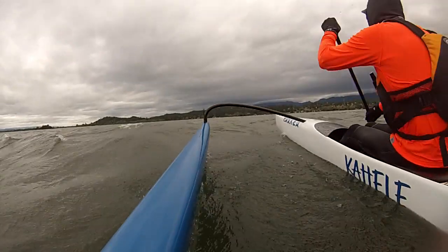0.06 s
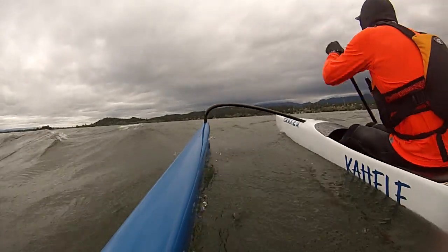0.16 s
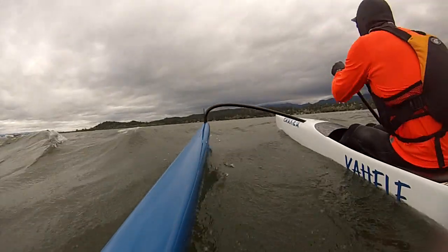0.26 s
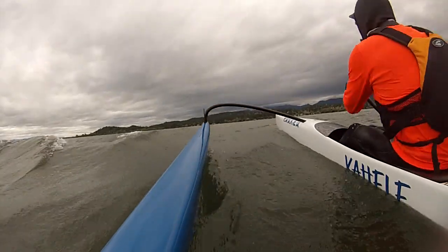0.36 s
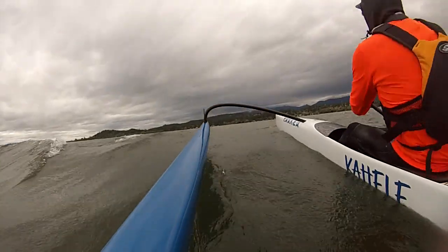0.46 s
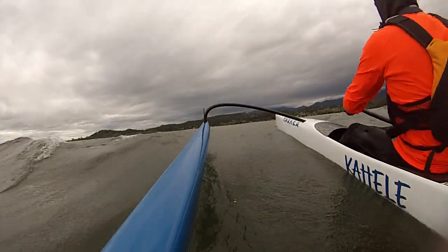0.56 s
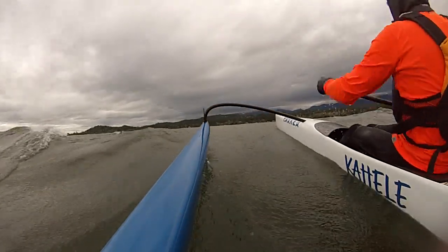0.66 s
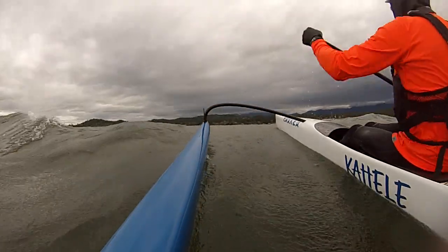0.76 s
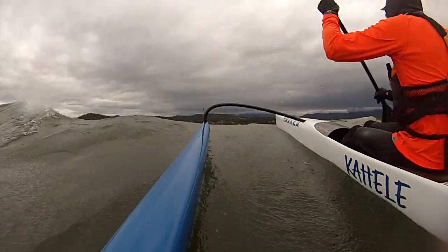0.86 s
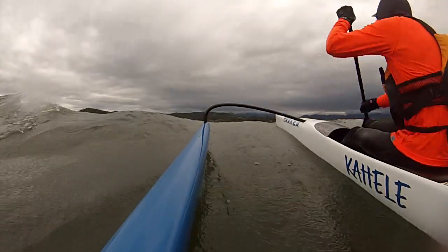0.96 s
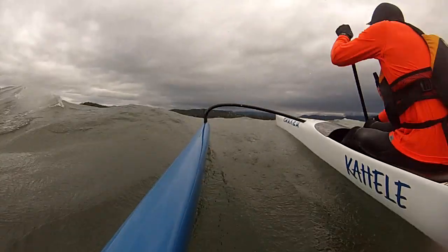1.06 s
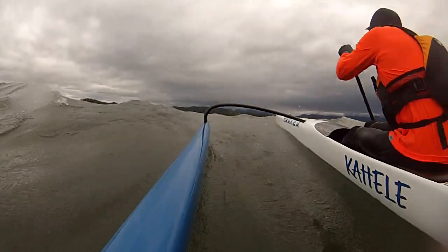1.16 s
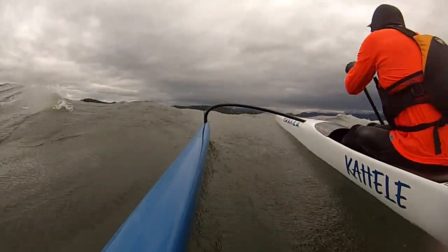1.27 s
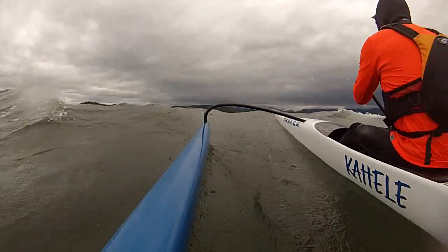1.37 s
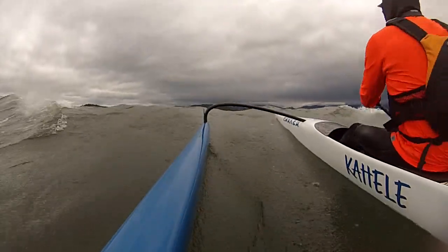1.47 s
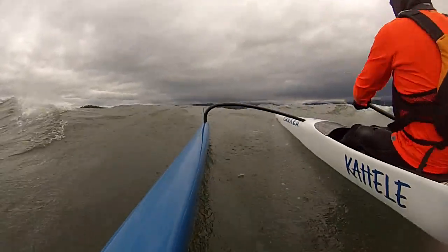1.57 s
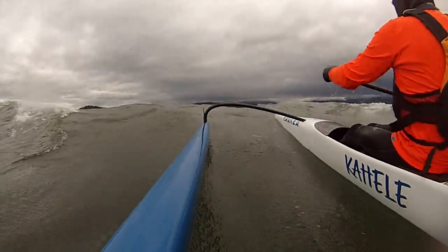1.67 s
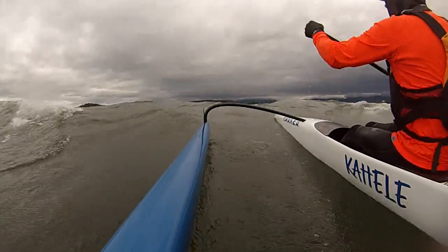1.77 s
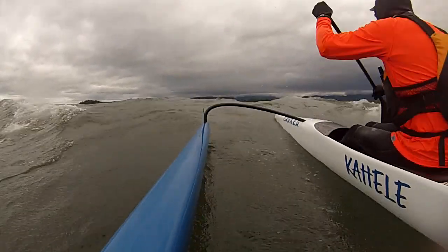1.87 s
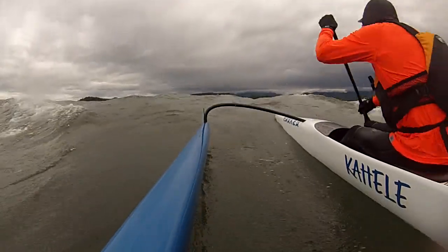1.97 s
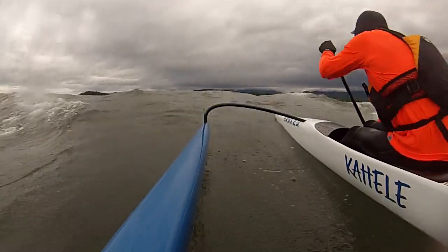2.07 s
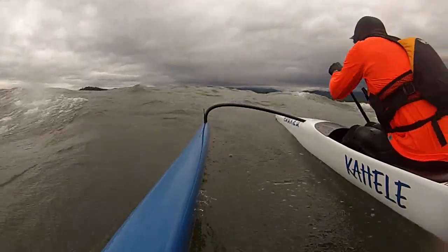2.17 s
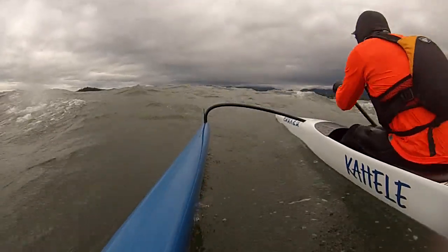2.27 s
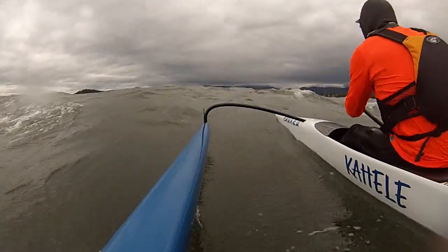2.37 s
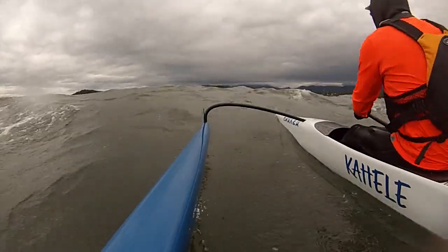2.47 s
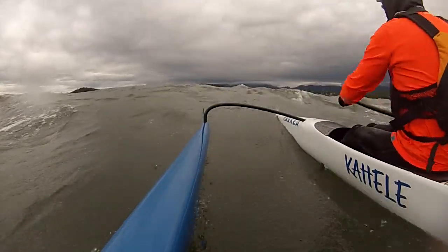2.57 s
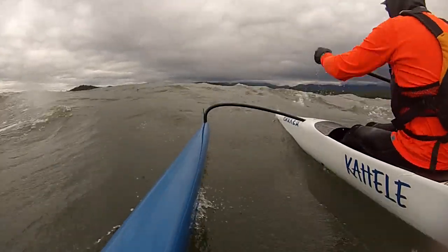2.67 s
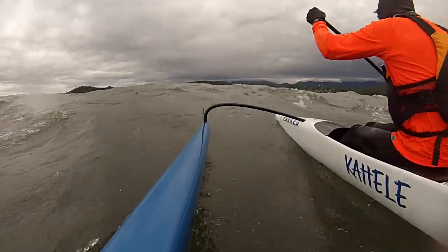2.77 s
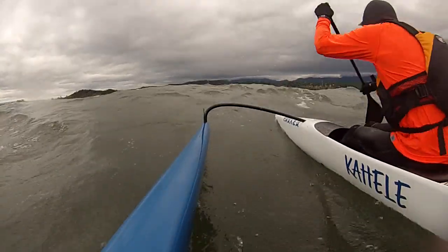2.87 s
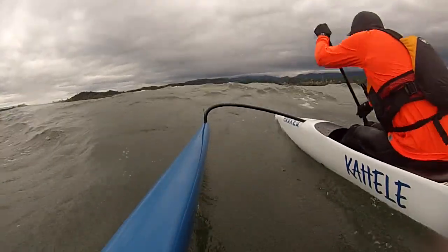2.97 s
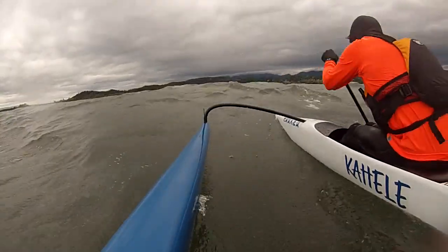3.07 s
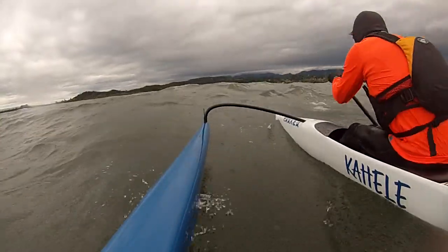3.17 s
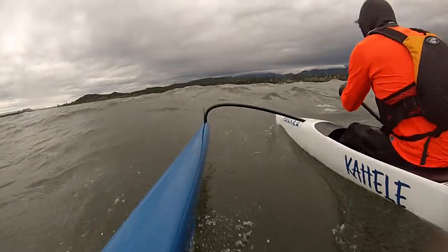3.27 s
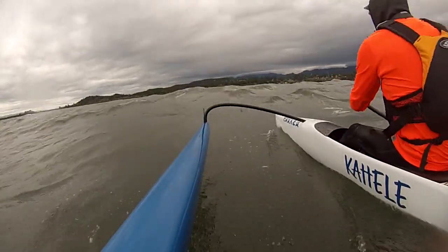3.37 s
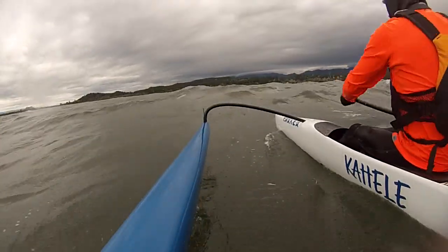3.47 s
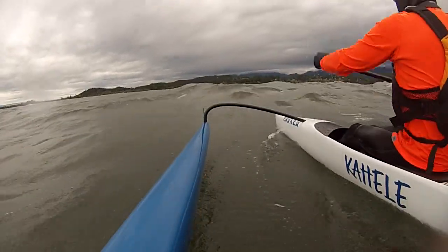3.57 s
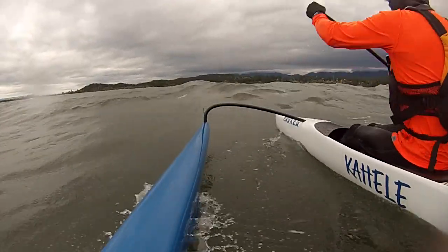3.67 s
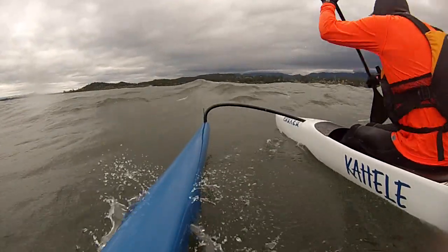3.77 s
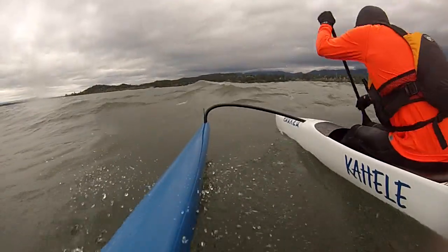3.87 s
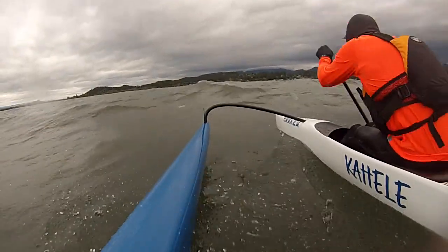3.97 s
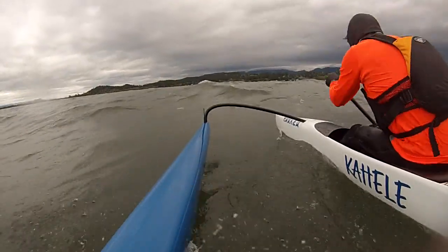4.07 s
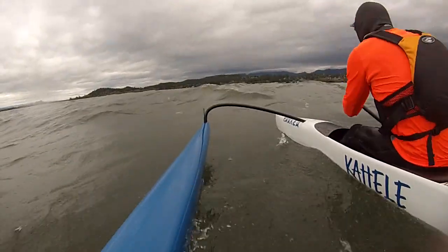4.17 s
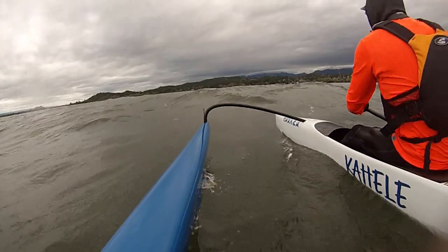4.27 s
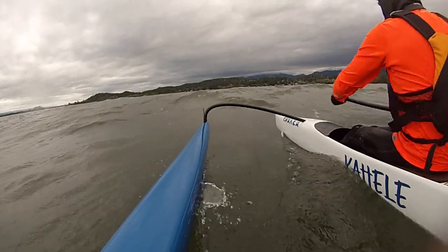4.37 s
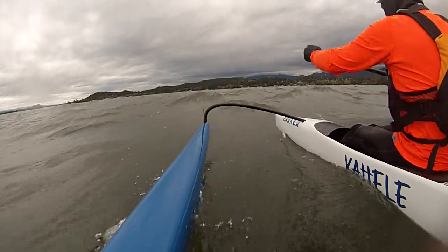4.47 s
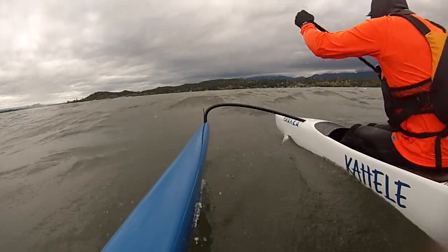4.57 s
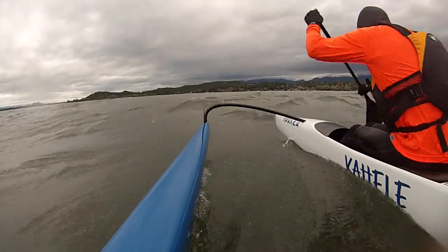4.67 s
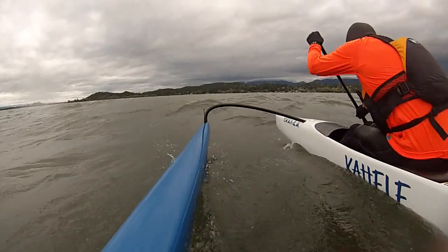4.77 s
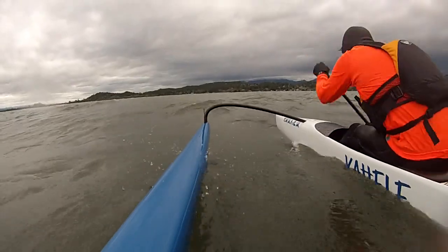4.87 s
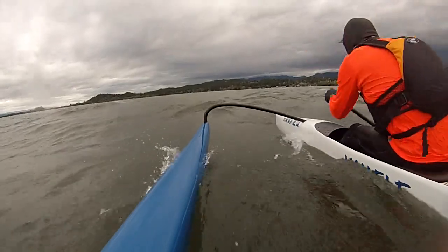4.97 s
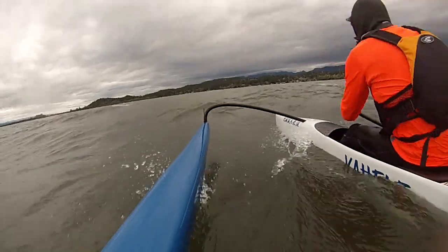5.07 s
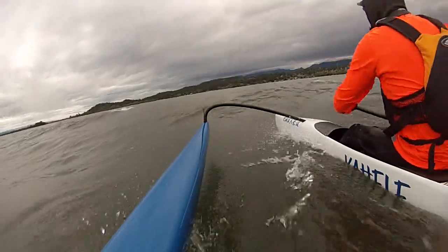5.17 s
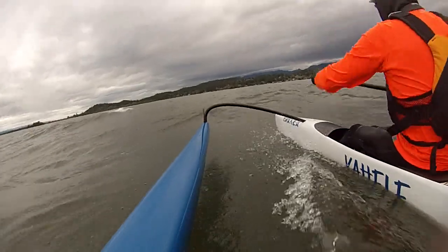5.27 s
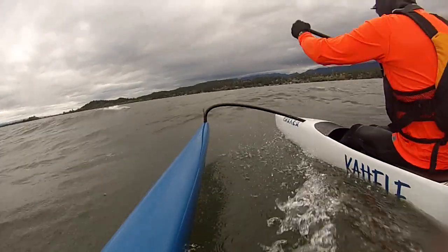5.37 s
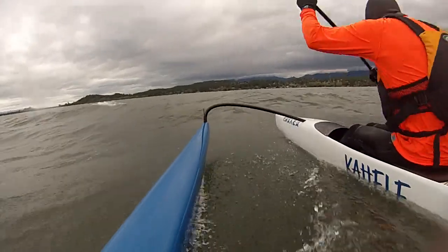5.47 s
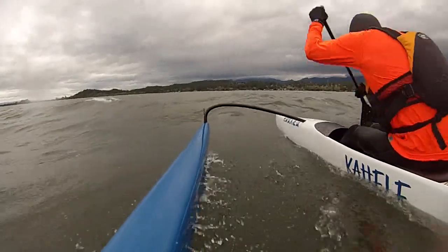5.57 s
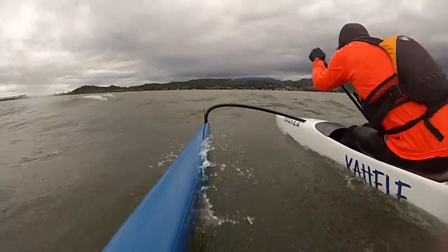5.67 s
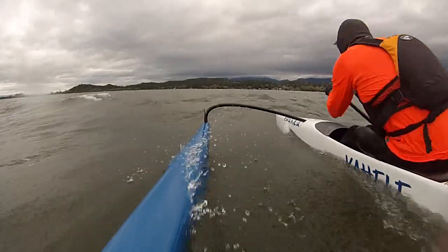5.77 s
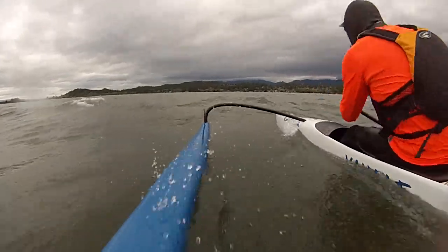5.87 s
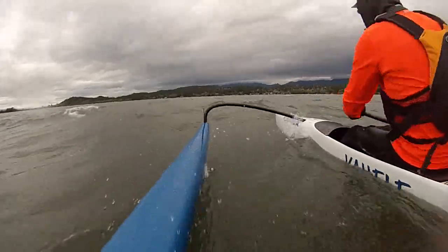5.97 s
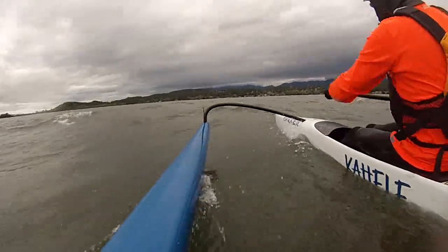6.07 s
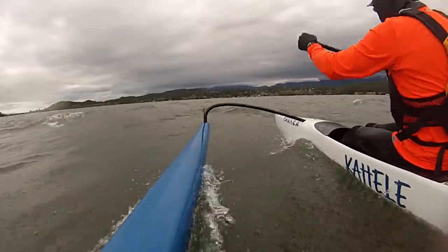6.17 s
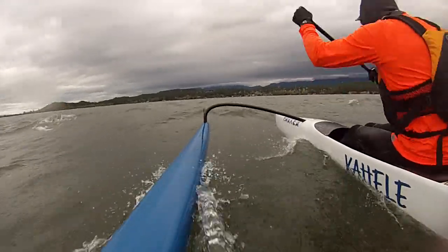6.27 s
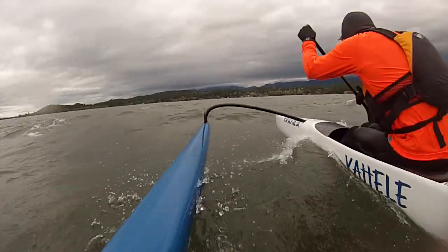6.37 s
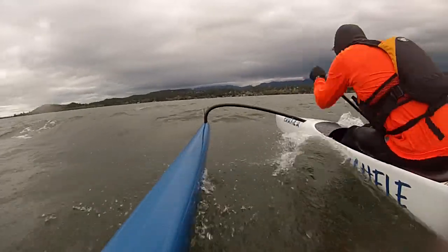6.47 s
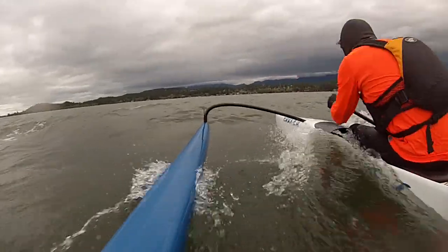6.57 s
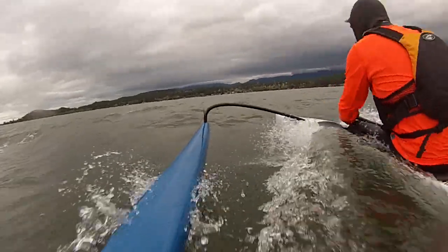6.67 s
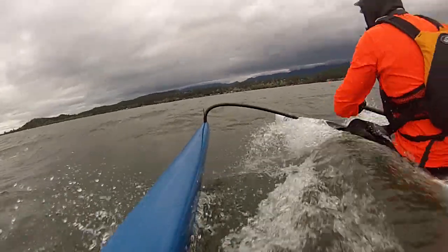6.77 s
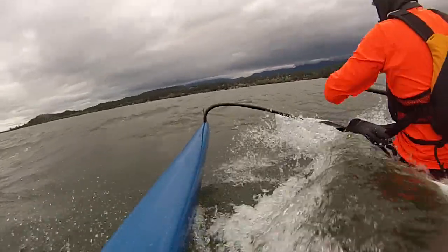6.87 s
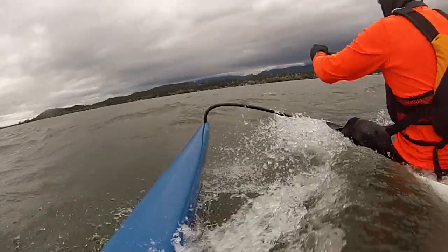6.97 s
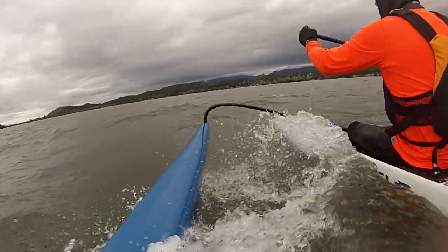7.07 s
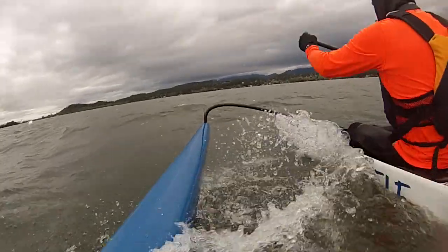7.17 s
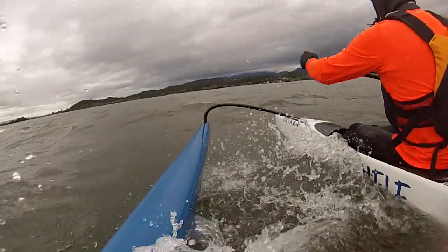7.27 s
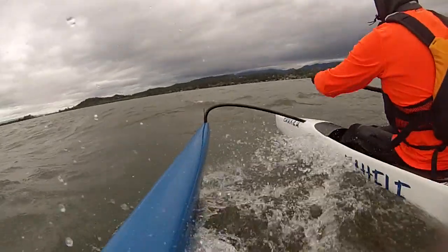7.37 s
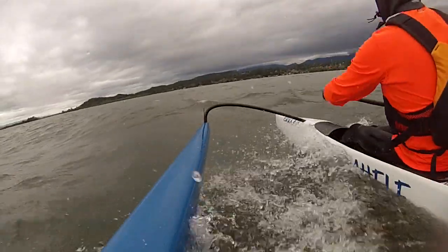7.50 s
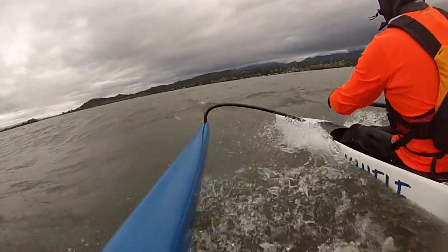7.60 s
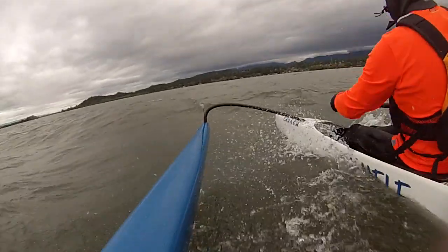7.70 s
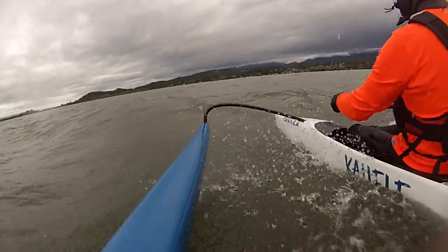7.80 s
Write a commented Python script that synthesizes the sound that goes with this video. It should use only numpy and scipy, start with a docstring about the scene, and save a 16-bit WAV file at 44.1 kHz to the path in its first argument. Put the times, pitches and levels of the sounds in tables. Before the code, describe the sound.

Muffled water washes and slaps against an outrigger canoe in choppy waves, with hollow thumps, bubbly plips and low wind rumble.

```python
"""Outrigger canoe surfing wind chop

Heard from a microphone sealed in a case on the float, so water arrives mostly through the shell:
wash, slaps and drops all ring the same hull and case resonances, and trapped bubbles plip.
Underneath, the mount sways, wind rumbles and the float drums and thumps on the waves.
Spray ticks on the case, and only a faint hiss of it gets through."""
import sys
import numpy as np
from scipy import signal
from scipy.io import wavfile

SR = 44100
rng = np.random.default_rng(int(sys.argv[2]) if len(sys.argv) > 2 else 0)


def wav_record(signal):
    """Record a signal, one row per channel, as 16-bit PCM in the file named by sys.argv[1]."""
    frames = np.transpose(np.atleast_2d(signal))
    bounded = np.clip(frames, -1, 1)
    # unit amplitude maps onto the largest positive 16-bit level
    quanta = np.round(bounded * 32767).astype(np.int16)
    wavfile.write(sys.argv[1], SR, quanta)


N = 345744


def amp(db):
    """dB to gain."""
    return 10 ** (np.asarray(db) / 20)


def rms_one(x):
    """Scale to rms 1."""
    return x / np.sqrt(np.mean(x ** 2) + 1e-20)


def curves(rows):
    """Automation lanes from a table of breakpoints, one value a sample."""
    times, *columns = np.transpose(rows)
    return [np.interp(np.arange(N) / SR, times, column) for column in columns]


def drift(rate):
    """Slow random modulation of rms 1; a higher rate moves faster."""
    step, settle = 40, 2000
    pole = np.exp(-2 * np.pi * rate * step / SR)
    noise = rng.standard_normal(N // step + settle + 2)
    slow = signal.lfilter([1], [1, -2 * pole, pole * pole], noise)[settle:]
    return np.interp(np.arange(N) / step, np.arange(len(slow)), rms_one(slow))


def bandpass(low_hz, high_hz, order=2):
    """A gentle band-pass filter."""
    return signal.butter(order, [low_hz, high_hz], "band", fs=SR, output="sos")


def band_noise(low_hz, high_hz, order=2):
    """Band-passed noise of rms 1."""
    return rms_one(signal.sosfilt(bandpass(low_hz, high_hz, order), rng.standard_normal(N)))


def peaks_and_dips(table):
    """A parametric EQ, one bell a row."""
    sections = []
    for hz, width_hz, db in table:
        w, gain = 2 * np.pi * hz / SR, amp(db / 2)
        damp = np.sin(w) * width_hz / hz / 2
        zeros = [1 + damp * gain, -2 * np.cos(w), 1 - damp * gain]
        poles = [1 + damp / gain, -2 * np.cos(w), 1 - damp / gain]
        sections.append(np.array(zeros + poles) / poles[0])
    return np.array(sections)


def swell(t, attack_s, decay_s):
    """A soft attack on a tail that falls 60 dB in decay_s."""
    return (1 - np.exp(-t / attack_s)) * amp(-60 * t / decay_s)


def span(start_s, samples):
    """An event's slice of the timeline and its own clock in seconds."""
    start = round(start_s * SR)
    end = min(N, start + samples)
    return slice(start, end), np.arange(end - start) / SR


def wavering(hz, spread, rate):
    """A tone of rms 1 whose pitch wanders."""
    pitch_hz = hz * (1 + spread * drift(rate))
    return np.sqrt(2) * np.sin(2 * np.pi * np.cumsum(pitch_hz) / SR)


def add_plop(out, start_s, db, hz, decay_s, length_s, scatter, count):
    """Mix in a quick run of bubbles near one pitch: dying sines that bend up, each softer than the last."""
    where, t = span(start_s, round(length_s * SR))
    for k, (detune, wait) in enumerate(rng.random((count, 2))):
        age = np.maximum(t - k * wait * .12 * decay_s, 0)
        envelope = amp(db - 4.5 * k) * swell(age, .00049, decay_s)
        pitch_hz = hz * (1 + scatter * (2 * detune - 1) * min(k, 1))
        out[where] += envelope * np.sin(2 * np.pi * pitch_hz * (age + .56 * age * age))


# Level ride of the swaying mount: (time [s], level [dB])
SWAY = [(0.0, -35), (0.13, -27.5), (0.48, -40.5), (1.44, -46.5), (1.53, -38), (1.94, -42), (2.12, -30.5),
        (2.36, -39.5), (3.75, -44), (3.8, -47), (4.34, -30.5), (4.65, -46), (4.78, -34.5), (5.46, -43.5),
        (6.2, -36), (6.24, -25), (6.4, -28), (6.46, -46), (6.62, -20), (6.79, -31), (7.64, -25.5),
        (7.84, -34)]


def sway_and_rumble():
    """The mount sways on one sub-bass note; wind rumble follows part of its swing."""
    (sway_db,) = curves(SWAY)
    sway = amp(sway_db + 1.65 * drift(5.2)) * wavering(hz=39, spread=.027, rate=8.6)
    rumble_db = -45 + .63 * (sway_db - sway_db.mean())
    return sway + amp(rumble_db) * band_noise(14, 40)


# Sheets of spray flung over the case: (time [s], body level [dB], top against body [dB])
SPRAY_SHEETS = [(2.5294, -57, -12), (2.9607, -51, -20), (3.1164, -56, -9), (3.3677, -52, -15),
                (3.4181, -52, -12), (3.6706, -40, -13), (4.1739, -46, -15), (4.2634, -64, -5),
                (5.4094, -57, -10), (5.529, -42, -21), (5.9394, -54, -15), (6.3086, -54, -22),
                (6.9486, -40.5, -18), (6.9794, -33, -19), (7.0873, -47, -21), (7.2424, -50, -16),
                (7.447, -38, -25)]


def sheet_envelopes():
    """Each sheet of spray flares up and dies fast; rows: body, top."""
    envelopes = np.zeros((2, N))
    for start_s, db, top_db in SPRAY_SHEETS:
        where, t = span(start_s, SR // 3)
        envelopes[:, where] += amp([[db], [db + top_db]]) * swell(t, attack_s=.0081, decay_s=.07)
    return envelopes


# Bed of airborne spray: (time [s], level [dB])
SPRAY_BED = [(0.0, -66), (1.09, -69.5), (2.68, -64), (2.82, -66.5), (3.38, -65), (3.62, -58.5), (3.95, -65),
             (4.11, -60), (4.3, -60.5), (4.72, -62), (5.17, -60.5), (5.43, -56), (5.79, -57), (6.07, -54),
             (6.6, -57), (7.12, -44.5), (7.44, -48), (7.84, -50)]
# Colour of the air path through the case: (centre [Hz], width [Hz], gain [dB])
CASE_EQ = [(2970, 3800, -0.5), (4410, 1220, -9.5), (5100, 170, 2.5), (5840, 270, -8.5), (6820, 720, 2),
           (7500, 320, 1), (9400, 550, 0), (11700, 310, -0.5), (14000, 4000, -7)]


def spray(drops, splash):
    """Smooth hiss with a few droplets in it leaks through the case; breaking water brightens it."""
    (bed_db,), (sheet_body, sheet_top) = curves(SPRAY_BED), sheet_envelopes()
    body = amp(bed_db) + splash + sheet_body
    top = amp(bed_db - 20) + .15 * splash + sheet_top
    out = 0
    for low_hz, high_hz, envelope in [(2510, 4870, body), (6770, 10800, top)]:
        hiss = band_noise(low_hz, high_hz)
        droplets = rms_one(signal.sosfilt(bandpass(low_hz, high_hz), drops))
        flutter = amp(1.45 * drift(26))
        out = out + envelope * flutter * (hiss + amp(-6.5) * droplets)
    return signal.sosfilt(peaks_and_dips(CASE_EQ), out)


def stray_drops(count=50):
    """Random cues for small drops: they ride the spray bed, and the higher ones are softer."""
    when, height, softness = rng.random((count, 3)).T
    times, octaves = when * N / SR, 2 * height
    bed_db = np.interp(times, *np.transpose(SPRAY_BED))
    levels_db = bed_db + 1 - 5 * octaves - 8 * softness
    return list(zip(times, levels_db, 3000 * 2 ** octaves))


# The loudest spray drops on the case: (time [s], relative level [dB], pitch [Hz])
SPATTER = [(2.371, -56, 6160), (2.375, -50, 3060), (2.518, -58, 9090), (2.726, -52, 3190),
           (3.117, -59, 8910), (3.368, -56, 7580), (3.42, -57, 9130), (3.672, -46, 5200),
           (3.682, -44, 6800), (4.15, -54, 4180), (4.264, -49, 9090), (4.538, -51, 6890),
           (4.721, -55, 3830), (4.976, -54, 5500), (5.549, -50, 5250), (6.227, -52, 4900),
           (6.977, -48, 9300), (7.088, -46, 6160), (7.177, -26, 3220), (7.233, -33, 2950),
           (7.243, -46, 8350), (7.286, -43, 7880), (7.447, -43, 4100), (7.457, -43, 3010)]


def spatter(ring_cycles=39.4):
    """Spray drops strike the case as tiny pitched ticks."""
    out = np.zeros(N)
    for start_s, db, hz in SPATTER + stray_drops():
        add_plop(out, start_s, db + 9, hz, ring_cycles / hz, length_s=.05, scatter=.061, count=2)
    return out


# Waves knocking the float: (time [s], lower mode level [dB], upper mode against it [dB])
KNOCKS = [(0.009, -24.5, -16.5), (0.199, -43, -13), (0.428, -14, -26), (0.619, -40, -6), (1.121, -28, -15),
          (1.199, -29, -11), (1.359, -32, -15), (1.696, -24, -20), (1.751, -36, -21), (1.949, -20, -17),
          (2.189, -25.5, -7), (2.374, -16.5, -3), (2.449, -18, -11), (2.525, -21, -24), (2.589, -18, -24),
          (2.698, -29.5, 0), (3.049, -22, -3), (3.151, -24.5, 0), (3.254, -35, -8), (3.504, -22, -16),
          (3.681, -17, -20), (3.751, -24, -19), (4.001, -15.5, -5.5), (4.059, -21.5, -1), (4.19, -21.5, -9),
          (4.277, -20, -24), (4.493, -23, -19), (4.61, -29, -17), (4.762, -16.5, -23), (4.9, -26, -9),
          (5.114, -47, -13), (5.235, -34, -2), (5.388, -20, -15), (5.547, -8, -7), (5.634, -28, 4),
          (5.785, -35, -12), (5.88, -25, 8), (6.095, -31, 1), (6.208, -22.5, 3.5), (6.284, -26, -1),
          (6.369, -24, 0), (6.518, -21, -6), (6.593, -11, -3), (6.649, -10, -3.5), (6.76, -8.5, -4),
          (6.839, -21, -4), (6.916, -20, 5), (7.005, -17, -15), (7.099, -26, 1), (7.28, -18, 5.5),
          (7.454, -32, -8), (7.604, -11.5, 1), (7.661, -25, -16), (7.772, -30.5, -13)]


def float_drum(lower_hz=146, upper_hz=167):
    """Two close modes with buffeting around them: the wash keeps them murmuring, knocks swell them."""
    wash_db = curves(WATER_FLOW)[1]
    envelopes = np.array([amp(wash_db - 5 + 1.5 * drift(14.2)) for _ in range(2)])
    for start_s, db, upper_db in KNOCKS:
        where, t = span(start_s, SR // 2)
        envelopes[:, where] += amp([[db], [db + upper_db]]) * swell(t, attack_s=.027, decay_s=.2)
    lower, upper = envelopes
    buffeting = amp(-5.5) * (lower + upper) * band_noise(115, 200)
    lower_mode = lower * wavering(lower_hz, spread=.0415, rate=7.14)
    upper_mode = upper * wavering(upper_hz, spread=.0289, rate=7.9)
    return lower_mode + upper_mode + buffeting


# Landings of the float: (time [s], relative level [dB], pitch [Hz], decay [s])
THUMPS = [(2.433, -35, 91.5, 0.23), (3.53, -27, 109, 0.27), (3.67, -7, 122, 0.24), (3.71, -28, 78.6, 0.44),
          (5.269, -23.5, 100, 0.38), (5.538, -11, 126, 0.23), (5.561, -19, 68.4, 0.45),
          (6.209, -38, 105, 0.25), (6.581, -24, 122, 0.31), (7.002, -7.5, 131, 0.4),
          (7.404, -13.5, 86.1, 0.19), (7.779, -14, 99, 0.26)]


def float_thumps():
    """The float drops onto a wave with a hollow thump."""
    out = np.zeros(N)
    for start_s, db, hz, decay_s in THUMPS:
        add_plop(out, start_s, db - 4.5, hz, decay_s, length_s=.5, scatter=.2, count=2)
    return out


# Pitched bubble accents: (time [s], relative level [dB], pitch [Hz], decay [s])
PLIPS = [(0.116, -15.5, 2110, 0.051), (0.164, -17.5, 552, 0.069), (0.256, -25.5, 730, 0.098),
         (0.354, -28, 496, 0.08), (0.562, -25, 2094, 0.079), (0.856, -25, 2100, 0.06),
         (1.605, -16, 1340, 0.027), (2.073, -24, 1555, 0.067), (2.374, -4, 349, 0.1),
         (2.373, -9, 1236, 0.05), (2.96, -26.5, 2060, 0.092), (3.061, -19, 1600, 0.022),
         (3.139, -21.5, 2116, 0.073), (3.368, -35, 1240, 0.1), (4.071, -21.5, 2004, 0.22),
         (4.153, -18.5, 1284, 0.085), (4.249, -24.5, 992, 0.063), (4.29, -12.5, 2100, 0.039),
         (4.385, -9.5, 1287, 0.069), (4.761, -12.5, 393, 0.12), (4.876, -16, 2196, 0.036),
         (4.924, -30, 2130, 0.097), (5.88, -22, 1364, 0.12), (5.9, -13, 400, 0.1),
         (6.207, -15.5, 2060, 0.08), (6.775, -16, 409, 0.1), (6.76, -24, 1350, 0.08),
         (7.128, -9, 2217, 0.11), (7.187, -11, 2090, 0.06), (7.229, -13, 1300, 0.061),
         (7.267, -11.5, 1360, 0.071)]


def bubble_plips():
    """Bubbles trapped under the shell ring in tight clusters."""
    out = np.zeros(N)
    for start_s, db, hz, decay_s in PLIPS:
        add_plop(out, start_s, db - 7.5, hz, decay_s, length_s=.25, scatter=.121, count=6)
    return out


def drop_texture(median_per_s=420, spread_db=4, ring_cycles=20, pitches=24):
    """Drops and bubbles come in clumps; each rings a few cycles at one of many pitches."""
    sizes = amp(spread_db * np.minimum(rng.exponential(1, N), 3.8)) * rng.choice([-1, 1], N)
    born = rng.random(N) < median_per_s * amp(5 * drift(9)) / SR
    pitch_index, out = rng.integers(0, pitches, N), 0
    for k, hz in enumerate(np.geomspace(300, 11000, pitches)):
        pole, w = amp(-60 * hz / ring_cycles / SR), 2 * np.pi * hz / SR
        strikes = sizes * born * (pitch_index == k) + 1e-18
        ring = signal.lfilter([0, np.sin(w)], [1, -2 * pole * np.cos(w), pole * pole], strikes)
        out = out + w * ring   # equal loudness per Hz across the pitches
    return out


# Water slapping the shell:
# (time [s], patter level [dB], wash against patter [dB], fizz against patter [dB], base decay [s])
SLAPS = [(0.103, -22.5, -11, 1.5, 0.17), (0.356, -29.5, -4, -23, 0.045), (0.438, -35, 3.5, -10, 0.28),
         (0.477, -35, -10, -16, 0.1), (0.658, -35.5, -6, -4, 0.07), (0.876, -34, -10, -4, 0.069),
         (1.013, -32, -15, -33, 0.043), (1.339, -34.5, 3.5, -21, 0.074), (1.392, -37, -6, -22, 0.13),
         (1.641, -36, 3.5, -13, 0.055), (2.073, -35.5, -14.5, -2, 0.12), (2.173, -21.5, -4, -3, 0.12),
         (2.372, -3, -2.5, -28, 0.1), (2.634, -25.5, -4.5, 0.5, 0.25), (2.748, -27.5, -6, -10, 0.1),
         (2.961, -32, -7, 2, 0.11), (3.046, -38.5, 6.5, 1, 0.3), (3.159, -17.5, -5.5, -23, 0.063),
         (3.177, -29, 14, -26, 0.067), (3.368, -34, -8, 3.5, 0.12), (3.44, -25, -0.5, -4, 0.2),
         (3.506, -32.5, -2, 6.5, 0.15), (3.593, -17.5, -1.5, -15, 0.041), (3.647, -32, 9, -17, 0.11),
         (3.67, -23, 12.5, -0.5, 0.19), (3.998, -22, -5, -26, 0.033), (4.048, -48, 5, -3, 0.3),
         (4.153, -19.5, -1.5, -4.5, 0.21), (4.203, -28, 11.5, -11, 0.11), (4.383, -21.5, -24, -8, 0.12),
         (4.457, -26.5, -0.5, -6, 0.2), (4.508, -28, 4.5, -17, 0.14), (4.759, -20, 11, 0.5, 0.1),
         (4.799, -28, 9.5, -23, 0.11), (4.838, -24, 4.5, -22, 0.11), (5.11, -25.5, 0.5, -11, 0.11),
         (5.236, -26.5, -2.5, -2.5, 0.28), (5.272, -23, -6, 2, 0.041), (5.355, -25.5, 0.5, -3, 0.1),
         (5.382, -34.5, 15, -3, 0.2), (5.539, -19, 7.5, -1, 0.15), (5.581, -28, 0, -21, 0.11),
         (5.853, -16.5, -5, -33, 0.08), (5.881, -22.5, 3, -28, 0.11), (6.143, -25, 0, -2.5, 0.3),
         (6.206, -26.5, 7, 8, 0.14), (6.296, -29, 2.5, -13, 0.16), (6.548, -19.5, 2, -30, 0.095),
         (6.591, -22.5, 6.5, -6.5, 0.2), (6.699, -22.5, 10, -27, 0.1), (6.761, -15, 3.5, -30, 0.034),
         (6.81, -39, -16, -2, 0.072), (6.915, -18.5, 1, 0, 0.064), (6.978, -19.5, 5, -12, 0.19),
         (7.008, -8.5, 4, -12, 0.063), (7.097, -24, -2, 4, 0.19), (7.193, -18, -6, -15, 0.1),
         (7.228, -19, 0, -2, 0.1), (7.267, -15, -3, -17, 0.18), (7.338, -31, -14, -2, 0.071),
         (7.432, -23, -2, 4.5, 0.071), (7.478, -27, 0, -15, 0.25), (7.543, -18.5, -8, 0, 0.08),
         (7.687, -30.5, 13, -18, 0.033), (7.74, -29.5, 6, -1, 0.1), (7.773, -24, 2, -2.5, 0.066)]


def slaps(rebound_s=.006, rebound_loss_db=7, spray_db=-43):
    """Water lands in three quick blows and a dying splash; envelope rows: wash, patter, fizz, spray."""
    blows, splashes = np.zeros((2, 4, N))
    decay_scale = np.array([[1.3], [.9], [.8], [.55]])   # the brighter bands die sooner
    for start_s, db, wash_db, fizz_db, decay_s in SLAPS:
        where, t = span(start_s, SR // 3)
        gains = amp(db + np.array([wash_db, 0, fizz_db, spray_db]))
        waits_s = np.cumsum(rebound_s * rng.uniform(.6, 1.4, 3))
        waits_s[0] = 0   # the first blow lands on the cue
        for k, wait_s in enumerate(waits_s):
            blows[:, where.start + round(wait_s * SR)] = amp(-1 - rebound_loss_db * k) * gains
        tail = swell(t, attack_s=.0026, decay_s=np.clip(decay_s * decay_scale, .01, .4))
        splashes[:, where] += amp(-5) * gains[:, None] * tail
    return blows, splashes


# Resonances and dips of hull and case: (centre [Hz], width [Hz], gain [dB])
SHELL_EQ = [(76.2, 4.5, 16), (105, 45, -0.5), (208, 67, 1), (282, 48, -3), (355.2, 60, 12),
            (452.6, 71, 9.5), (580, 190, -1), (886, 60, -10.5), (1005, 49, 5), (1267, 62, 5),
            (1340, 336, 8), (1600, 380, 2.5), (1857, 100, -10.5), (2067, 136, 7.5), (2180, 480, 4),
            (2457, 400, 7)]


def shell_filter(case_cut_hz=3000, hull_cut_hz=483):
    """The shell rings, while the sealed case and the hull wall both muffle it."""
    case = signal.butter(3, case_cut_hz, fs=SR, output="sos")
    hull = signal.butter(1, hull_cut_hz, fs=SR, output="sos")
    return np.vstack([peaks_and_dips(SHELL_EQ), case, hull])


# Water running along the shell: (time [s], surge [dB], wash [dB], patter [dB], fizz [dB])
WATER_FLOW = [(0.0, -60, -36.5, -44.5, -52), (0.92, -52, -47, -51, -62), (1.53, -54, -39.5, -45.5, -78),
              (2.03, -71, -44, -49, -56), (2.55, -33, -35.5, -39.5, -53), (2.93, -48.5, -43.5, -47, -52.5),
              (3.41, -42, -42, -48.5, -57), (3.64, -32, -33, -34.5, -43), (3.86, -42, -33, -41, -44),
              (4.11, -46, -41.5, -44, -58), (4.26, -54, -37.5, -43.5, -43),
              (4.69, -54, -38.5, -39.5, -42.5), (5.06, -41.5, -35.5, -39.5, -46.5),
              (5.43, -49, -34, -33.5, -39.5), (5.65, -30, -35, -40.5, -44), (5.87, -43, -31, -36, -44),
              (6.09, -39.5, -30.5, -33, -38), (6.57, -43.5, -36.5, -37, -47),
              (6.81, -31.5, -25, -27.5, -36), (7.12, -31.5, -25, -26.5, -29), (7.47, -34, -25, -29, -32),
              (7.84, -25, -26.5, -29.5, -41.5)]
# Voicing of surge, wash, patter, fizz: (low edge [Hz], high edge [Hz], flutter [dB], drop share [0-1])
WATER_BANDS = [(56.4, 139, 2.5, 0.04), (165, 738, 2.5, 0.02), (798, 1637, 1.57, 0.43),
               (1846, 2226, 2.76, 0.25)]


def water_on_shell(drops, blows, splashes):
    """Rushing noise, drops and slaps ring the shell in four bands."""
    shell, rush, shared_flutter = shell_filter(), rng.standard_normal(N), drift(10)
    bands = zip(WATER_BANDS, curves(WATER_FLOW), [0, *blows], [0, *splashes])   # slaps skip the surge
    out = 0
    for (low_hz, high_hz, flutter_db, drop_share), flow_db, blow, splash in bands:
        path = np.vstack([bandpass(low_hz, high_hz), shell])
        # noise and drops leave the shell at rms 1, a unit blow at peak 1
        unit_rush, unit_drops = [x / np.std(signal.sosfilt(path, x)) for x in (rush, drops)]
        ring_peak = np.abs(signal.sosfilt(path, signal.unit_impulse(4096))).max()
        texture = np.sqrt(1 - drop_share) * unit_rush + np.sqrt(drop_share) * unit_drops
        flow = amp(flow_db + flutter_db * (shared_flutter + drift(11.3)))
        out = out + signal.sosfilt(path, flow * texture + splash * unit_rush + blow / ring_peak)
    return out


def scene():
    """Water, spray and the low end of the float meet at one microphone."""
    drops, (blows, splashes) = drop_texture(), slaps()
    water = water_on_shell(drops, blows, splashes)
    highs = spray(drops, splashes[-1]) + spatter()
    lows = float_thumps() + float_drum() + sway_and_rumble()
    return (water + bubble_plips() + highs + lows)[None]


def record(dry):
    """Dull microphone hiss, soft saturation on the peaks and a steep high cut."""
    hiss = amp(-70) * band_noise(2000, 6000, order=1)
    saturated = 1.235 * np.tanh((dry + hiss) / 1.19)
    high_cut = signal.ellip(12, .3, 60, 15070, fs=SR, output="sos")
    return signal.sosfilt(high_cut, saturated)


dry = scene()
out = record(dry)
wav_record(out)
```